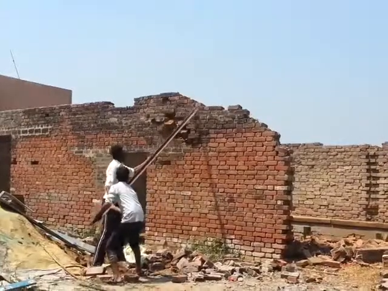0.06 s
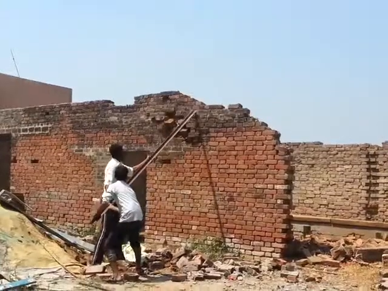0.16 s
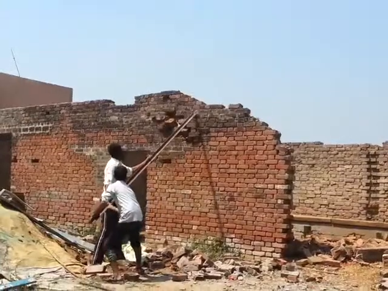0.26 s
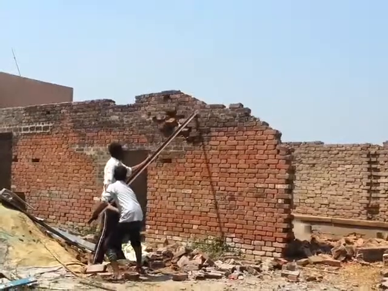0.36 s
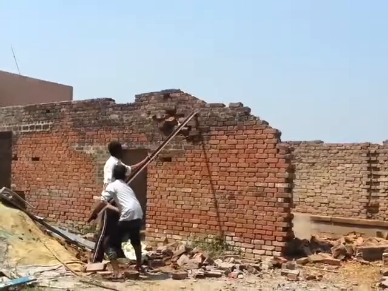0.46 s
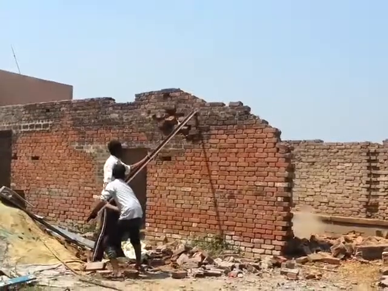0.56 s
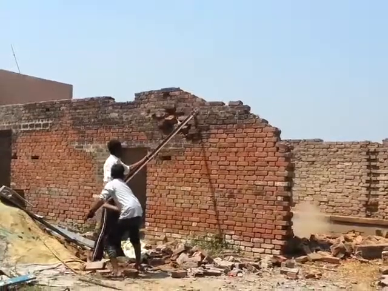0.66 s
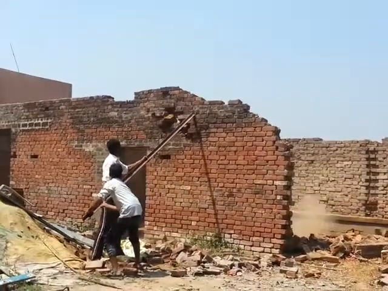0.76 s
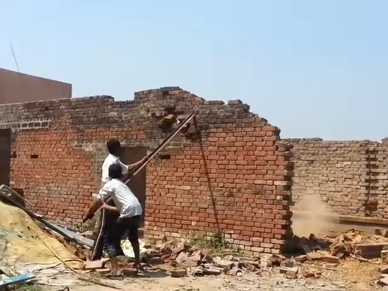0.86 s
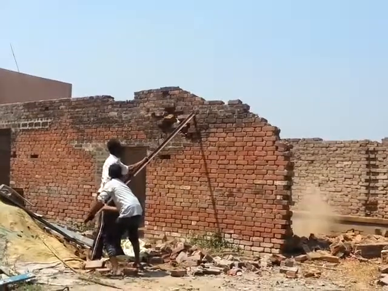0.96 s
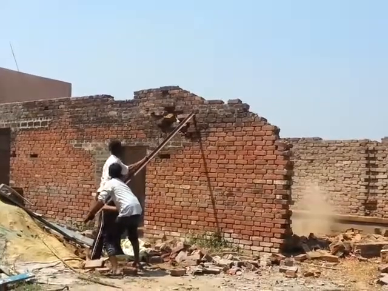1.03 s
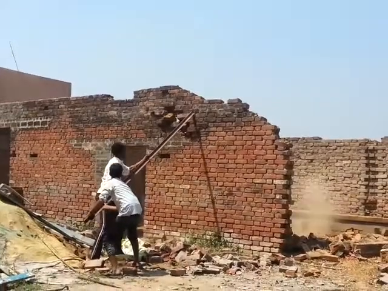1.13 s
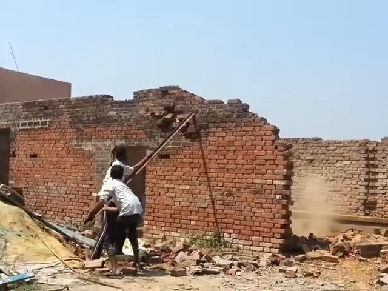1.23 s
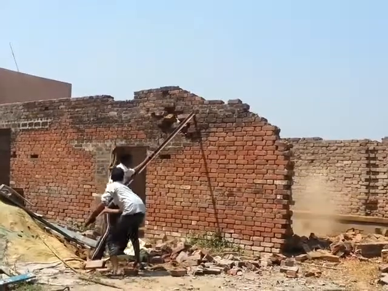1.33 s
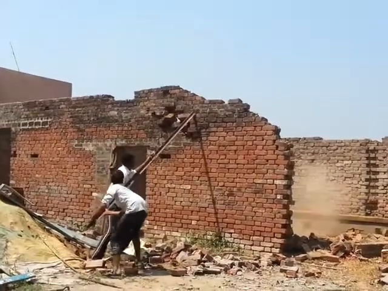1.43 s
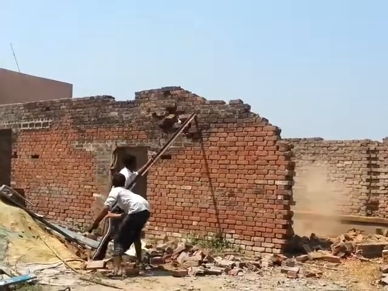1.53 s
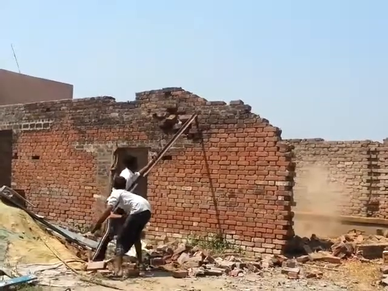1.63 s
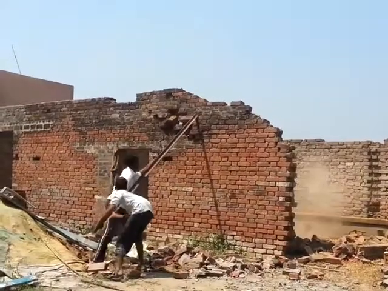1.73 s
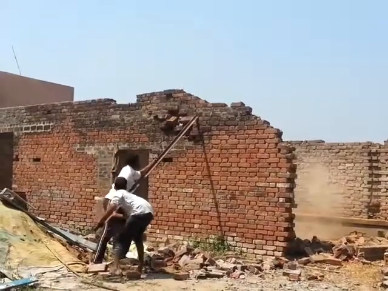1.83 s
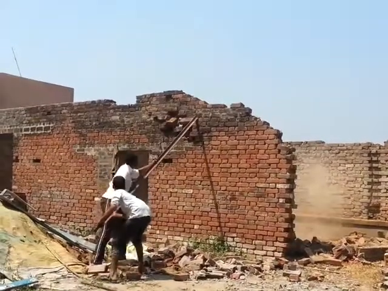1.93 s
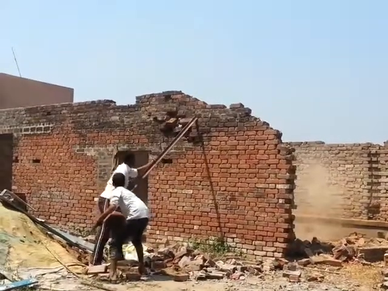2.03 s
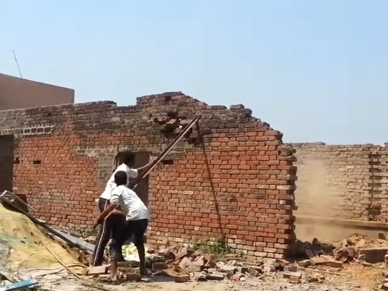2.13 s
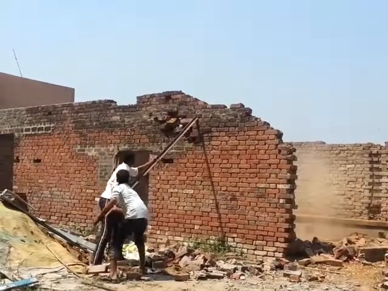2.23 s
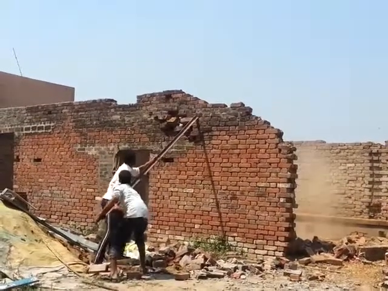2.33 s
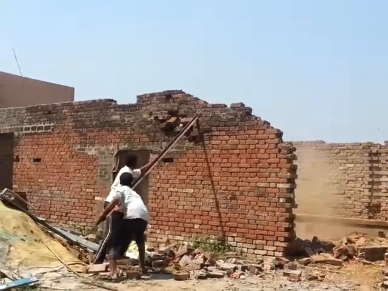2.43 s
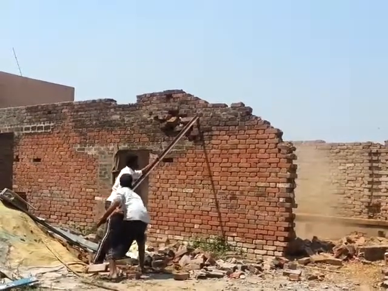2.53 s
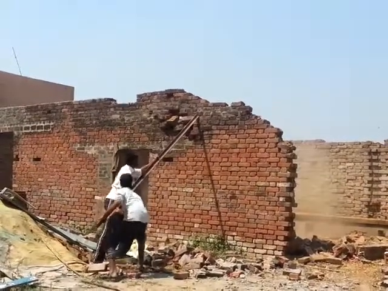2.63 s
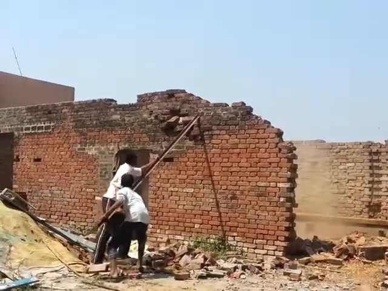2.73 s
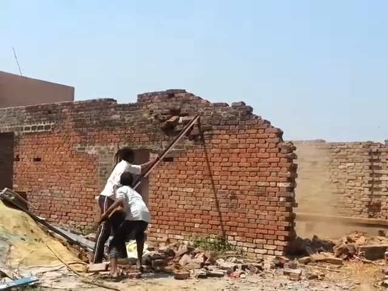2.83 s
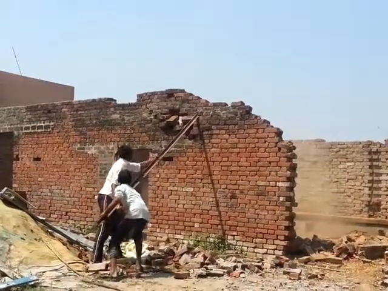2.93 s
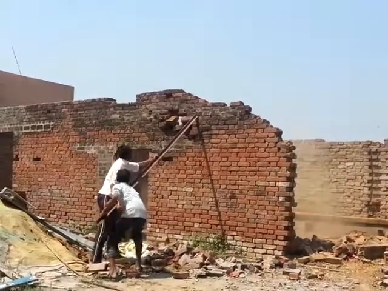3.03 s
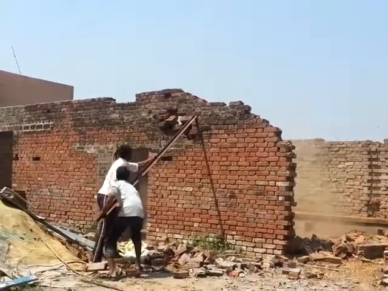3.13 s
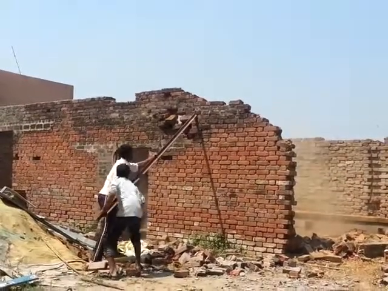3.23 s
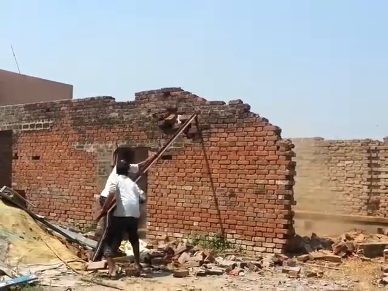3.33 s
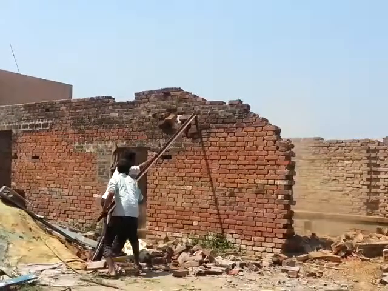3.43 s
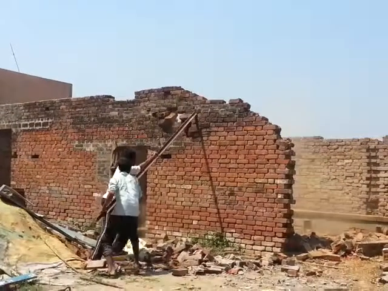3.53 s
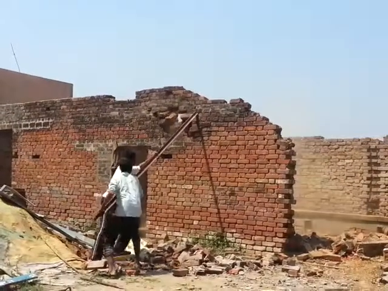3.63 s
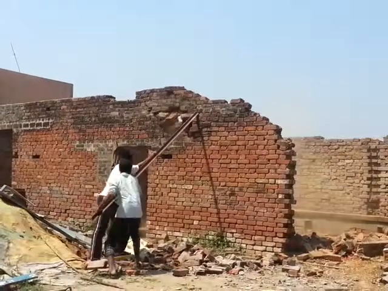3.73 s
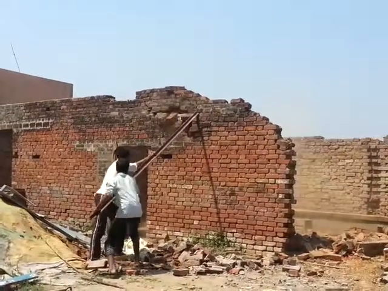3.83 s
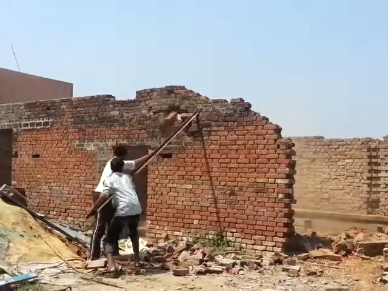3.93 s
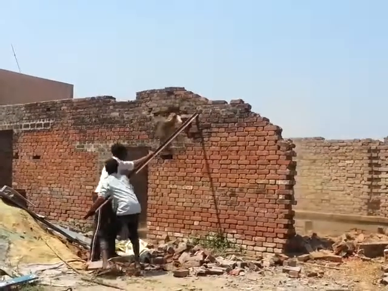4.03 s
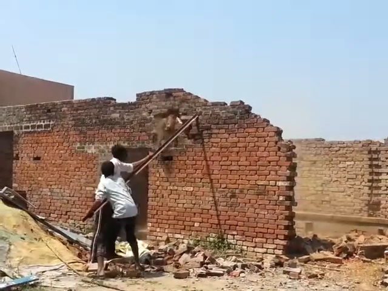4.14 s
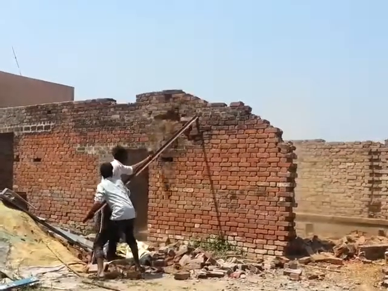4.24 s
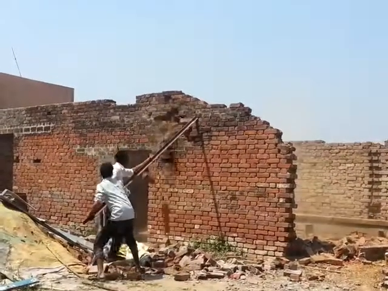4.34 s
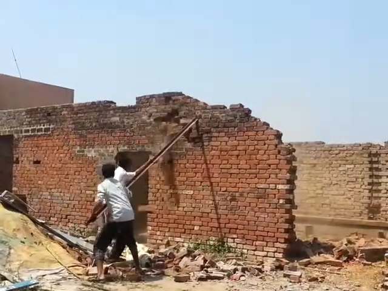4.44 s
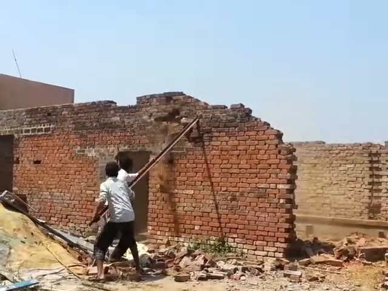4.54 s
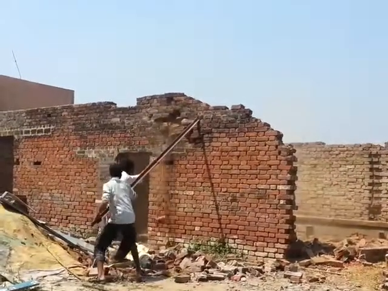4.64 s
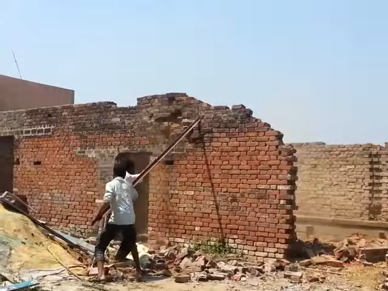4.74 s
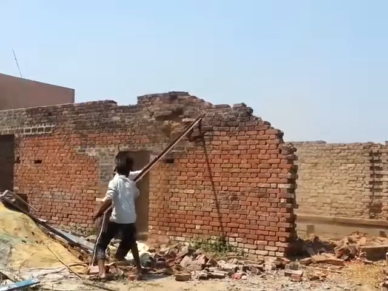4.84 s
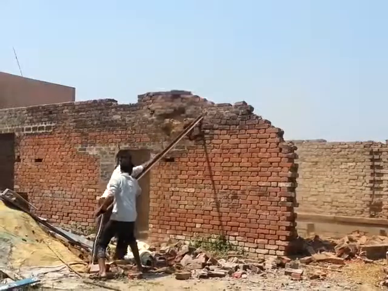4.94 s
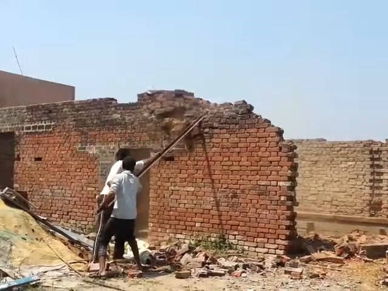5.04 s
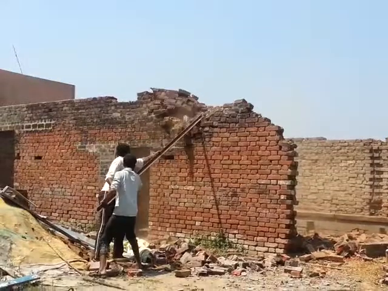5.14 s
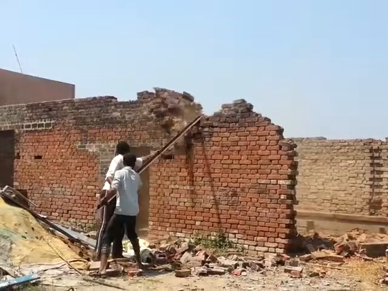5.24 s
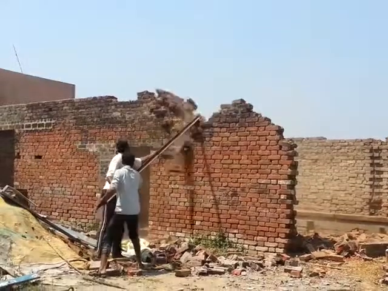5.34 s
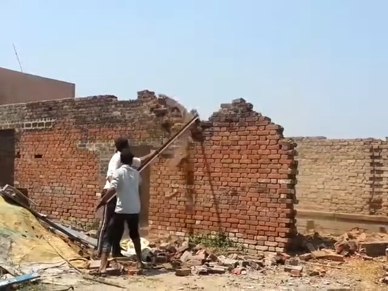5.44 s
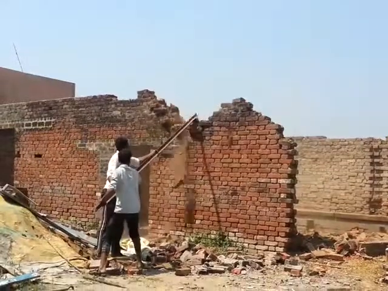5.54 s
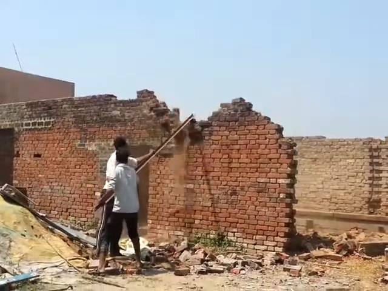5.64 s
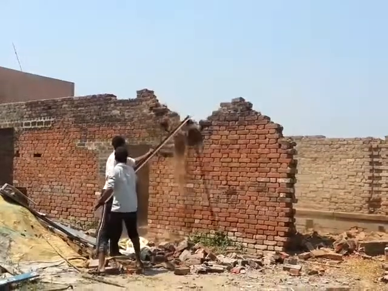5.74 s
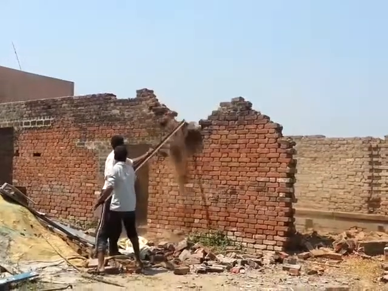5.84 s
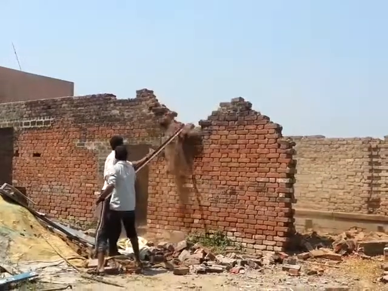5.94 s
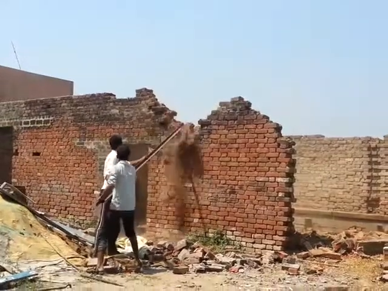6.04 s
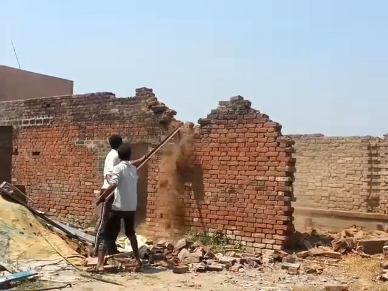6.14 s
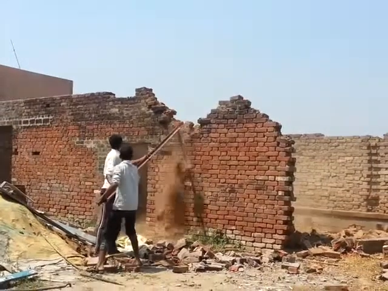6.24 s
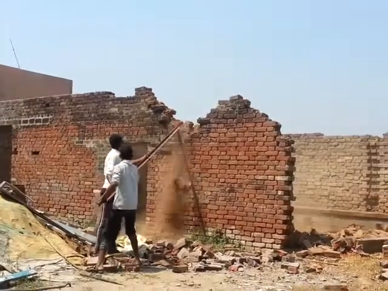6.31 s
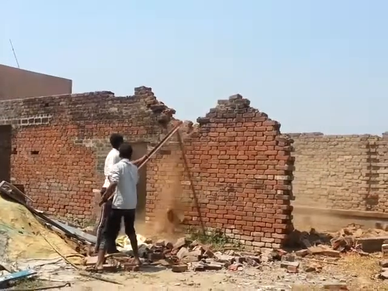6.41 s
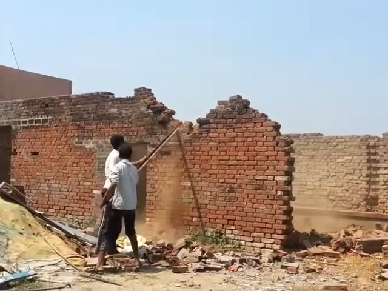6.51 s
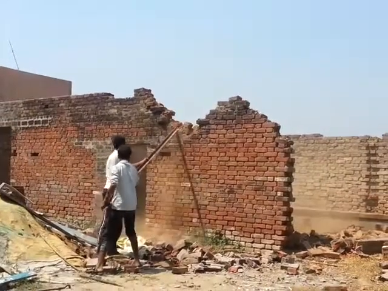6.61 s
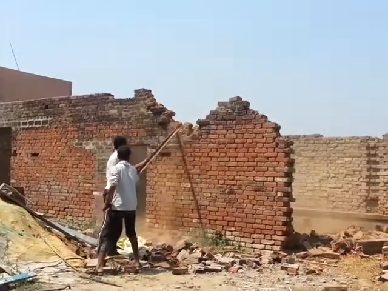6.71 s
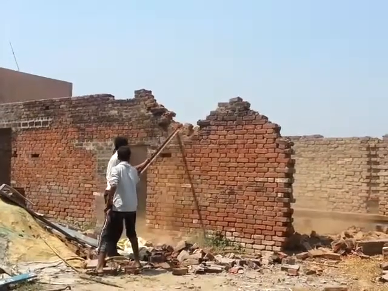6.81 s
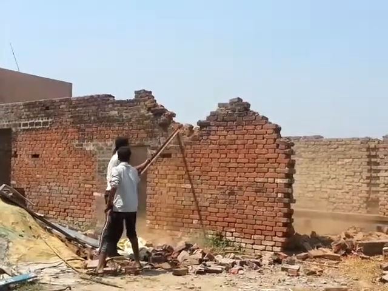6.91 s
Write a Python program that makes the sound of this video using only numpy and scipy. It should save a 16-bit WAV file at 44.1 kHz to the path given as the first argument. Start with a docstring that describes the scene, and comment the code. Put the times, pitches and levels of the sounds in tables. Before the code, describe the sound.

Outdoors at a demolition site, with a soft steady hush and a short thin echo from surrounding walls. From 0 to about 1 s a load of bricks slides down behind the wall, a grainy clatter with dull knocks and a sharp crack near 0.8 s. Then it is nearly quiet: faint isolated taps at 1.4, 2.0 and 2.4 s, and a thin, distant falling bird whistle around 2.2 s. From 3.4 to 4.5 s a pole scrapes and ticks, loosening gritty mortar. Two bricks land hard at 4.65 and 4.8 s, each with a quick second slap, followed by small taps and trickling crumbs. From 5.6 to 6.65 s a whole section pours down in loud, overlapping cracks, rattling fragments and bright clinks, strongest around 5.7-5.8 and again 6.25-6.6 s. A few small clinks and grit end it near 6.9 s.

```python
"""Bricks levered off a wall

Bricks are levered off the top of a wall with a pole at an open building site: one load slides down
behind the wall, the pole scrapes and taps, two bricks drop, then a whole section pours onto the rubble.
Slides are streams of random contacts filtered by piece size; blows are crushing bursts that shed crumbs;
sound pieces ring in damped bar modes. A faint bird is a gliding sine, the open air is coloured noise."""
import sys
import numpy as np
from scipy import signal
from scipy.fft import rfft, irfft
from scipy.io import wavfile
from scipy.ndimage import uniform_filter1d

SR = 44100
rng = np.random.default_rng(int(sys.argv[2]) if len(sys.argv) > 2 else 0)


def int16_out(signal):
    """Quantize to a 16-bit WAV file."""
    q = np.round(np.clip(np.atleast_2d(signal).T, -1, 1) * 32767)
    wavfile.write(sys.argv[1], SR, q.astype(np.int16))


N = 307377
TIME = np.arange(N) / SR


def from_db(db):
    """Amplitude gain is ten to the power of a twentieth of the decibels."""
    return 10 ** (np.asarray(db) / 20)


def rms_one(x):
    """Normalisation: scale to a mean power of 1."""
    return x / np.sqrt(np.mean(x ** 2) + 1e-20)


def at_hz(points, hz):
    """Logarithmic frequency scale: interpolate a spectrum's level between its points."""
    point_hz, level_db = np.array(points).T
    return np.interp(np.log(hz + 1), np.log(point_hz), level_db)


def response(points, size=4096):
    """Minimum phase: folding the cepstrum onto positive time gives a spectrum its causal impulse response."""
    hz = np.arange(size // 2 + 1) * SR / size
    cepstrum = irfft(np.log(from_db(at_hz(points, hz))))
    cepstrum[1:size // 2] *= 2
    cepstrum[size // 2 + 1:] = 0
    return irfft(np.exp(rfft(cepstrum)))


def through(x, impulse):
    """Linear filtering: convolve both channels with an impulse response."""
    return signal.fftconvolve(x, np.atleast_2d(impulse), axes=1)[:, :N]


def add(out, start_s, sound):
    """Superposition: mix a sound in at its start time."""
    at = int(np.clip(start_s * SR, 0, N - 1))
    out[:, at:at + sound.shape[1]] += sound[:, :N - at]


def contacts(per_s, spread_db, size, port_lag_s=.00015):
    """Shot noise: random clicks of uneven force, each with its own small lag between the two ports."""
    count = max(int(per_s * size / SR), 1)
    at = rng.integers(0, size, count)
    uneven_db = spread_db * np.minimum(rng.exponential(1, count), 4)
    force = from_db(uneven_db) * rng.choice([-1, 1], count)
    lag = np.round(rng.normal(0, port_lag_s * SR, count)).astype(int)
    lagged = np.clip(at + lag, 0, size - 1)
    return rms_one(np.array([np.bincount(at, force, size), np.bincount(lagged, force, size)]))


def size_responses(lowest_hz):
    """Larger pieces radiate lower bands: one contact of a lump, a chip and a grain of grit, energy 1 each."""
    # colour of breaking brick: hz, level_db (per Hz)
    rubble = [(40, -41), (120, -34.5), (210, -15.5), (400, -5.5), (620, -6), (790, 4.5), (1080, 4.5),
              (1350, -1), (2050, 5.5), (2500, 1.5), (4300, 2), (5400, -3.5), (6200, -5), (10000, -8),
              (14500, -25)]
    # upper band edges of lumps, chips and grit: edge_hz
    size_edges_hz = (600, 5500, 16000)
    edges = (lowest_hz, *size_edges_hz)
    responses = []
    for band in zip(edges, edges[1:]):
        band_filter = signal.butter(3, band, "band", fs=SR, output="sos")
        shaped = signal.sosfilt(band_filter, response(rubble))
        responses.append(shaped / np.linalg.norm(shaped))
    return responses


def fragments(per_s, spread_db, cycles, ring_share, count=36):
    """Excited resonators: dry clicks plus short rings, each losing 60 dB in a set number of cycles."""
    rings = 0
    for hz in np.geomspace(300, 5400, count) * rng.uniform(.96, 1.04, count):
        radius = from_db(-60 * hz / (cycles * SR))
        angle = 2 * np.pi * hz / SR
        resonator = [1, -2 * radius * np.cos(angle), radius ** 2]
        strikes = contacts(per_s / count, spread_db, N) + 1e-18
        ring = signal.lfilter([1, 0, -1], resonator, strikes)
        rings = rings + rms_one(ring) * np.sqrt(hz)
    clicks = contacts(2 * per_s, spread_db, N)
    return np.sqrt(ring_share) * rms_one(rings) + np.sqrt(1 - ring_share) * clicks


def tumbling(stream, per_s, knock_s, depth):
    """Clustered arrivals: each tumbling lump throws an exponentially dying burst of contacts."""
    knocks = np.abs(contacts(per_s, 2.5, N)[0])
    bursts = signal.lfilter([1], [1, -np.exp(-1 / (knock_s * SR))], knocks + 1e-18)
    return stream * (1 + depth * rms_one(bursts))


def slide(rows, stream, sizes):
    """Granular flow: each load swells, then drains away; the powers of its three piece sizes add."""
    power = np.zeros((3, N))
    for start_s, chips_db, rise_s, fade_db_per_s, lumps_db, grit_db in rows:
        swell = np.sin(np.pi / 2 * np.clip((TIME - start_s) / rise_s, 0, 1))
        draining_s = np.maximum(TIME - start_s - rise_s, 0)
        flow = swell * from_db(chips_db - fade_db_per_s * draining_s)
        power += np.outer(from_db([lumps_db, 0, grit_db]) ** 2, flow ** 2)
    return sum(np.sqrt(p) * rms_one(through(stream, h)) for p, h in zip(power, sizes))


def near_slide(sizes):
    """Granular flow in the open: mortar scraped loose by the pole, then the section pouring onto the rubble."""
    # loads, levels ahead of the layer gain; lumps and grit relative to chips:
    # start_s, chips_peak_db, rise_s, fade_db_per_s, lumps_db, grit_db
    loads = [(3.45, -48.5, 0.33, 16, -16, -4), (3.638, -37, 0.02, 235, -0.5, -1),
             (4.10, -49.5, .035, 6.2, -26, -4.5), (4.405, -44, 0.0091, 270, -18, 1.5),
             (4.467, -33, 0.039, 210, -5.5, -9), (4.663, -22, 0.015, 220, -19, -14),
             (4.79, -30.5, .05, 100, -25, -6), (4.90, -41.5, 0.15, 4.1, -14, -9),
             (5.645, -23, 0.087, 46, -7.5, -6.5), (5.73, -19.5, .15, 74, -9, -11.5),
             (5.977, -19.5, 0.096, 135, -8, -12), (6.18, -31, 0.13, 40, -5.5, -12),
             (6.408, -22, .04, 150, -24, -12), (6.55, -29.5, 0.033, 63.5, -11, -5),
             (6.911, -47, 0.0042, 350, -14.5, 7.5)]
    pieces = fragments(per_s=1800, spread_db=3.0, cycles=83, ring_share=0.21)
    stream = tumbling(pieces, per_s=80, knock_s=.006, depth=0.18)
    return from_db(-0.23) * slide(loads, stream, sizes)


def far_slide(sizes):
    """Granular flow behind a barrier: loads slide down behind the wall, with a colour of their own."""
    # loads, levels ahead of the layer gain; lumps and grit relative to chips:
    # start_s, chips_peak_db, rise_s, fade_db_per_s, lumps_db, grit_db
    loads = [(-.02, -22, 0.018, 62, -2, -6.5), (.094, -14.5, .06, 97, -12.5, -11.5),
             (.195, -26.5, 0.071, 64, -3.5, -6), (.293, -24.5, 0.035, 106, -5.5, -8.5),
             (.447, -28, 0.039, 163, -12, -16), (.615, -34, 0.063, 70, -20, -7),
             (.693, -25, 0.11, 146, -26, -12.5), (.803, -16, 0.036, 237, -26, -25.5),
             (.922, -36, 0.025, 93, -9, -22)]
    # colour behind the wall, relative to in front: hz, level_db
    behind_wall = [(100, 0), (250, 3), (480, 1), (700, 1), (1050, -0.5), (1330, -2.5), (1650, 2.5),
                   (2400, 0.5), (3500, 0.5), (6000, -1.5), (10400, -2), (13400, -5)]
    pieces = fragments(per_s=2600, spread_db=3.0, cycles=225, ring_share=0.22)
    stream = tumbling(pieces, per_s=62, knock_s=0.0094, depth=0.08)
    return from_db(-0.17) * slide(loads, through(stream, response(behind_wall)), sizes)


def knock(body, t60, count=12, size=2048):
    """Modal impulse response of one contact: a click plus damped modes that differ from piece to piece."""
    t = np.arange(size) / SR
    hz = np.geomspace(1600, 9000, count)[:, None] * rng.uniform(0.918, 1.0, (count, 1))
    modes = np.cos(2 * np.pi * hz * t) * from_db(-60 * t * np.sqrt(hz / hz.mean()) / t60)
    return signal.unit_impulse(size) + body * modes.sum(axis=0)


def impacts(rows, sizes, crumbs_db, crumbs_t60, contacts_per_s, size=16384):
    """Brittle fracture: an edge crushes in a few milliseconds of hard contacts, then crumbs scatter."""
    t, out = np.arange(size) / SR, np.zeros((2, N))
    for start_s, crack_db, thud_db, grit_db, crush_s in rows:
        pressure = np.exp(-(t / crush_s) ** 4)
        hard_contacts = contacts(contacts_per_s, 1.5, size) * pressure
        crush = through(hard_contacts, knock(body=0.011, t60=0.038))[:, :size]
        crumbs = contacts(3200, 2.8, size) * from_db(crumbs_db - 60 * t / crumbs_t60)
        for h, db in zip(sizes, (thud_db, 0, grit_db)):
            crack = through(crush, h)
            # the fall sets the energy
            crack *= np.linalg.norm(pressure) * np.sqrt(2) / np.linalg.norm(crack)
            add(out, start_s, from_db(crack_db + db) * (crack + through(crumbs, h)))
    return out


def landings(sizes):
    """Double impact: each brick crushes a corner, then slaps down on its next edge."""
    # bricks landing, ahead of the layer gain; last three levels relative to crack:
    # start_s, crack_db, thud_db, grit_db, second_edge_db
    blows = [(0.010, -18, -9, -16, -10), (0.478, -27.5, -15.5, 0.5, -7), (0.824, -14, -20.5, -27, -6),
             (4.652, -13, -2, -17.5, -11), (4.813, -10.5, -11, -9.5, -5.5), (5.602, -23.5, -23, -16.5, -7),
             (5.664, -7, -13, -10.5, -27), (5.699, -17.5, -12, -15, 1.5), (5.800, -5, -17, -8.5, -21),
             (5.872, -19, -10.5, -5.5, -10), (5.982, -17.2, -17, -11, -13), (6.254, -12.5, -10, -7, -1.5),
             (6.402, -8.5, -12, -9.5, -19), (6.435, -19, -25, -7, -5), (6.460, -13, -14, -5.5, -24),
             (6.574, -10, -13, -8, -1.5)]
    crush_s, second_edge_s = 0.0072, .0145
    rows = []
    for start_s, crack_db, thud_db, grit_db, second_edge_db in blows:
        rows.append((start_s, crack_db, thud_db, grit_db, crush_s))
        rows.append((start_s + second_edge_s, crack_db + second_edge_db, thud_db, grit_db, crush_s))
    return from_db(-1.38) * impacts(rows, sizes, crumbs_db=-12.5, crumbs_t60=0.28, contacts_per_s=3600)


def small_knocks(sizes):
    """Single impact: the pole and small pieces hit just once, all equally brief and gritty."""
    # knocks, ahead of the layer gain; thud relative to crack: start_s, crack_db, thud_db
    taps = [(1.42, -43, -22), (1.976, -32.5, -13.5), (2.400, -41, -22), (2.596, -41, -12.5),
            (3.129, -43, -12), (3.51, -34.5, -10), (3.897, -34.5, -23), (3.981, -39.5, -16),
            (4.154, -37.5, -24), (4.179, -34.5, -19), (4.369, -45.5, 2.5), (4.409, -38, -22),
            (4.895, -28.5, -21), (4.920, -27, -30), (5.062, -31, -5), (5.156, -34.5, -6),
            (5.298, -31.5, -11), (5.352, -33, -9), (5.480, -32, -10), (5.575, -39, -0.5), (6.738, -28, -18),
            (6.914, -41, -15.5)]
    crush_s, grit_db = 0.0058, -12
    rows = [(start_s, crack_db, thud_db, grit_db, crush_s) for start_s, crack_db, thud_db in taps]
    return from_db(-0.9) * impacts(rows, sizes, crumbs_db=-14, crumbs_t60=0.28, contacts_per_s=3600)


def clinks(rattle=0.64, port_phase=0.00087, size=16384):
    """Modal vibration: a sound piece rings in a few bar modes, struck again and again as it tumbles."""
    # struck pieces, big ones low and dull, ahead of the layer gain: start_s, pitch_hz, peak_db, t60_s
    struck = [(0.005, 1930, -24, 0.13), (0.166, 887, -14, 0.047), (0.524, 1153, -31.5, 0.22),
              (0.748, 780, -32, .14), (0.845, 2270, -18, 0.26), (0.859, 2800, -18, 0.089),
              (1.035, 883, -45, 0.3), (1.195, 295, -34, 0.013), (2.402, 1960, -39, 0.12),
              (3.511, 2560, -40, 0.16), (3.897, 1915, -42, 0.13), (3.981, 805, -34.5, 0.051),
              (4.519, 2163, -35.5, 0.3), (4.652, 1835, -13, 0.18), (4.679, 7740, -18, 0.019),
              (4.684, 514, -20.5, 0.043), (4.813, 854, -11.5, 0.027), (4.816, 393, -18, 0.044),
              (5.481, 1836, -35, 0.11), (5.602, 1800, -37, .27), (5.802, 1070, -11, 0.045),
              (6.255, 2048, -8.5, 0.046), (6.255, 3052, -16, 0.23), (6.269, 3690, -11, 0.031),
              (6.461, 1490, -14.5, 0.06), (6.461, 2770, -22.5, 0.37), (6.482, 2090, -22, 0.17),
              (6.573, 3708, -5, 0.087), (6.589, 2073, -23, .15), (6.591, 4460, -12.5, .044),
              (6.844, 2780, -30, 0.14), (6.845, 3060, -30.5, 0.15), (6.856, 4950, -32, 0.091)]
    # modes of a brick: pitch_multiple, level_db
    brick_modes = [(0.951, -3), (0.999, 2), (1.02, -0.5), (1.179, -9), (1.882, -12), (2.36, -19)]
    t, out = np.arange(size) / SR, np.zeros((2, N))
    for start_s, pitch_hz, peak_db, t60_s in struck:
        touches = contacts(900, 1.8, size) * from_db(-60 * t / t60_s)
        touches *= rattle * np.sqrt(2) / np.linalg.norm(touches)
        touches[:, 0] += 1   # the first strike
        ring = 0
        for multiple, mode_db in brick_modes:
            # above the bass the two ports hear each mode at different phases
            port_shift = rng.normal(0, min(port_phase * pitch_hz, 1)) * np.array([[.5], [-.5]])
            phase = 2 * np.pi * pitch_hz * multiple * t + port_shift + rng.uniform(0, 2 * np.pi)
            ring = ring + from_db(mode_db - 60 * t * multiple / t60_s) * np.sin(phase)
        build_up = np.minimum(t * pitch_hz / 2, 1)   # over two cycles
        rattling = through(touches, ring * build_up)
        strength = np.linalg.norm(from_db(peak_db - 60 * t / t60_s))
        add(out, start_s, strength * rattling / np.linalg.norm(rattling))
    # the clinks carry no bass
    high_pass = signal.butter(2, 190, "high", fs=SR, output="sos")
    return from_db(3.0) * signal.sosfilt(high_pass, out)


def bird(warble=0.0465):
    """Frequency modulation: a thin, distant whistle wavers about a pitch that ends lower."""
    # a falling call, ahead of echo and treble tilt: time_s, pitch_hz, level_db
    call = [(2.13, 2520, -61), (2.19, 2750, -48), (2.26, 2565, -75), (2.305, 2690, -48.5),
            (2.364, 1970, -46.5), (2.39, 1900, -68)]
    time_s, pitch_hz, level_db = np.transpose(call)
    waver = rms_one(uniform_filter1d(rng.standard_normal(N), size=90))
    pitch = np.interp(TIME, time_s, pitch_hz) * (1 + warble * waver)
    level = np.interp(TIME, time_s, level_db, left=-120, right=-120)
    return from_db(level) * np.sin(2 * np.pi * np.cumsum(pitch) / SR)


def yard(x, echo_db=-11, t60=0.48, first_s=.011, size=24000):
    """Diffuse reflection: the surrounding walls scatter a short, thin echo from all sides."""
    t = np.arange(size) / SR
    decay = from_db(-60 * t / t60) * (t > first_s)
    echoes = contacts(3000, 0.78, size, port_lag_s=.0005) * decay
    return x + from_db(echo_db) * through(x, echoes / np.linalg.norm(echoes[0]))


def lean(x, amount):
    """Interaural level difference: opposite spectral tilts tip the treble towards the left port."""
    # balance at amount 1: hz, left_minus_right_db
    balance = [(200, -1.5), (1000, -0.5), (2200, -1), (3100, 6.5), (3650, 5.5), (4400, 7.5), (6500, 5),
               (8500, 5.5), (11000, 2), (14000, -1)]
    ports = []
    for side in (1, -1):
        ports.append(response([(hz, side * amount * db / 2) for hz, db in balance]))
    return through(x, ports)


def air(shared=0.3):
    """Partial coherence: a steady outdoor hush mixes independent noise with contacts common to both ports."""
    # colour of the open air: hz, level_db (per Hz)
    air_colour = [(30, -50), (90, -17), (200, -4), (400, 3), (1000, 3), (1400, -0.5), (2000, 2), (3000, 4),
                  (5000, 2), (5900, -5.5), (10000, -7), (14500, -11.5)]
    hush = rng.standard_normal((2, N)) + shared * contacts(30000, 0, N)
    return from_db(-48.5) * rms_one(through(hush, response(air_colour)))


def scene():
    """Superposition: slides, blows, taps, clinks and bird share the yard's echo, over the open air."""
    heap, single = size_responses(lowest_hz=32), size_responses(lowest_hz=246)
    slides = near_slide(heap) + far_slide(heap)
    bricks = landings(single) + small_knocks(single) + clinks()
    return lean(yard(slides + bricks + bird()), amount=0.9) + lean(air(), amount=0.35)


def record(dry):
    """Saturation and band limiting: the hardest cracks overload the microphone and the top is cut."""
    limited = dry / (1 + (dry / .93) ** 6) ** (1 / 6)
    low_pass = signal.ellip(10, .2, 70, 14800, fs=SR, output="sos")   # cutoff in Hz
    return signal.sosfilt(low_pass, limited)


dry = scene()
out = record(dry)
int16_out(out)
```